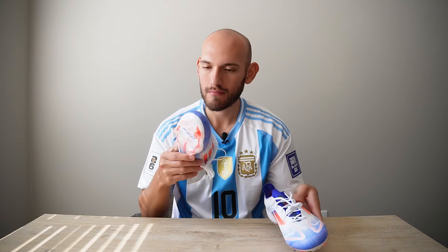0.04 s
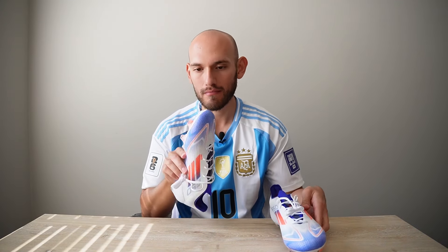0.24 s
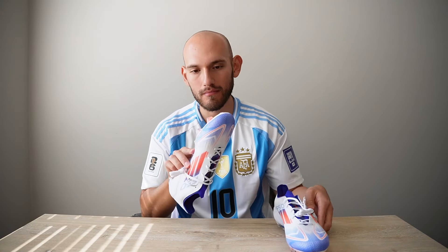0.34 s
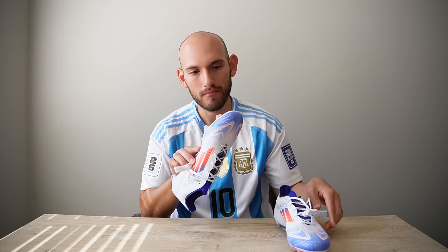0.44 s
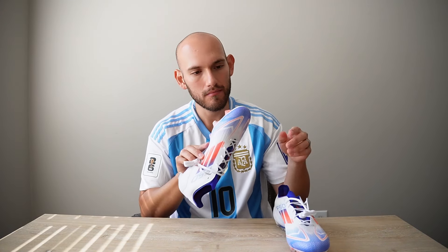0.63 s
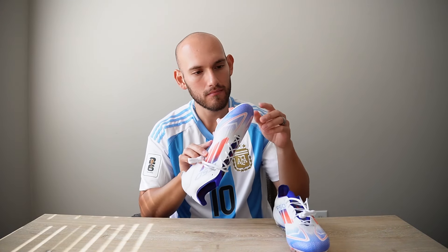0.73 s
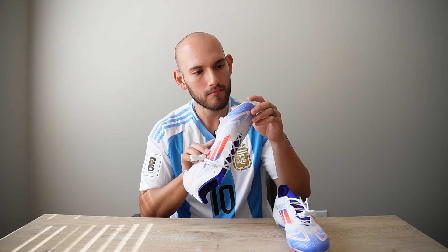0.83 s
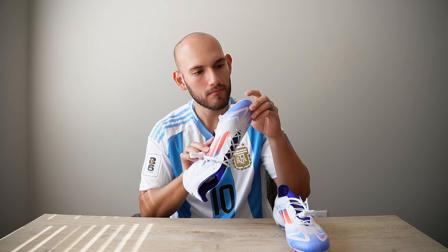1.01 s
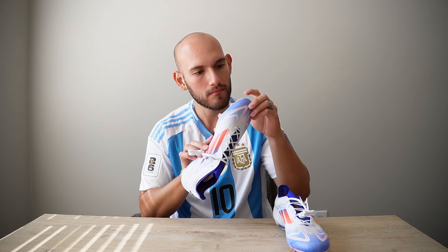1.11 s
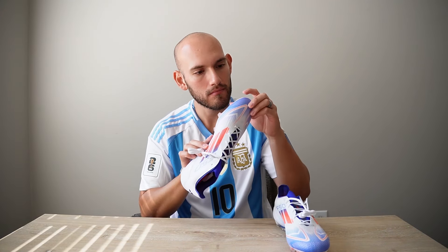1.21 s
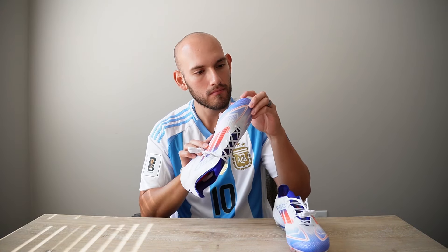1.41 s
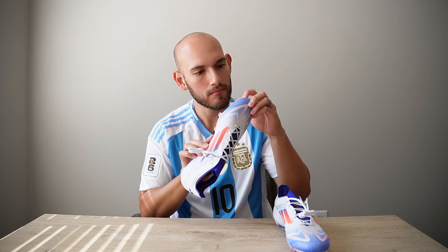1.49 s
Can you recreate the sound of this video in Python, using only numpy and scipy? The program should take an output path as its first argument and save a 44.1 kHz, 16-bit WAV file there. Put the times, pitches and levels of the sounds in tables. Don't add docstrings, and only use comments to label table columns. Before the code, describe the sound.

Hollow knocks of a hard-studded shoe landing and rocking on a wooden table, with brief scuffs and sleeve rustle, then quiet with soft fingertip taps; small bare room with short reverberation, microphone worn close by.

```python
import sys
import numpy as np
from scipy import signal
from scipy.fft import rfft, irfft
from scipy.io import wavfile
from scipy.ndimage import uniform_filter1d, minimum_filter1d

SR = 44100
rng = np.random.default_rng(int(sys.argv[2]) if len(sys.argv) > 2 else 0)


def invert_db(level):
    return 10 ** (np.asarray(level, dtype=float) / 20)


def store_wav(level_fs):
    pcm = np.round(np.clip(np.atleast_2d(level_fs), -1, 1) * 32767)
    wavfile.write(sys.argv[1], SR, pcm.T.astype(np.int16))


N = 68355


def unit(x):
    return x / np.sqrt(np.mean(x ** 2))


def coloured(points):
    hz, db = np.array(points).T
    f = np.maximum(np.fft.rfftfreq(N, 1 / SR), 1)
    gain = invert_db(np.interp(np.log(f), np.log(hz), db))
    return unit(irfft(rfft(rng.standard_normal(N)) * gain, N))


def walk(rate):
    k = int(SR / rate)
    steps = np.repeat(rng.standard_normal(N // k + 1), k)
    return unit(uniform_filter1d(uniform_filter1d(steps, k), k)[:N])


def decay(age, t60):
    return np.exp(-np.log(1000) * age / t60)


def ring(start, hz, db, t60, rise=1e-4, phase=0.):
    age = np.maximum(np.arange(N) / SR - start, 0)
    swell = (1 - np.exp(-age / rise)) ** 2
    return invert_db(db) * swell * decay(age, t60) * np.sin(2 * np.pi * hz * age + phase)


def modal_hits(hits, modes, trim_db=0):
    return sum((-1) ** k * ring(start, hz, db + trim_db + mode_db, t60)
               for start, db in hits for k, (hz, mode_db, t60) in enumerate(modes))


def bursts(rows, colour, rise):
    envelope = np.zeros(N)
    for start, db, t60 in rows:
        age = np.maximum(np.arange(N) / SR - start, 0)
        envelope += invert_db(db) * (1 - np.exp(-age / rise)) * decay(age, t60)
    return coloured(colour) * envelope


# f/Hz, level/dB
ROOM_TONE_COLOUR = [(12, -41), (20, -5.5), (71, -8), (108, -8), (244, -1.5), (314, -8.5), (506, -7),
                    (15200, -27.5), (16500, -35)]


def room_tone():
    return invert_db(-56 + .5 * walk(7.64)) * coloured(ROOM_TONE_COLOUR)


# t/s, dull rub level/dB, fine hiss level/dB
RUSTLE = [
    (0, -50.5, -72),
    (0.102, -44.5, -67.5),
    (.2, -48.5, -75),
    (.35, -42.5, -65.5),
    (.45, -43.5, -64.5),
    (.55, -46.5, -66.5),
    (.65, -48.5, -67),
    (.8, -55, -93),
]
# f/Hz, level/dB
RUB_COLOUR = [(59, -64), (100, -7), (269, -5.5), (410, 3.5), (521, 4), (1380, -8), (4450, -14.5),
              (8000, -34.5), (10400, -81), (17600, -120)]
STILL_S = (.8, .95)


def rustle():
    t = np.arange(N) / SR
    times, rub_db, hiss_db = np.array(RUSTLE).T
    flicker_db = 1.3
    hiss_noise = coloured([(4450, -14), (9650, 0), (14850, -10)])
    rub = invert_db(np.interp(t, times, rub_db) + flicker_db * walk(30)) * coloured(RUB_COLOUR)
    hiss = invert_db(np.interp(t, times, hiss_db) + flicker_db * walk(47)) * hiss_noise
    return np.interp(t, STILL_S, (1, 0)) * (rub + hiss)


# f/Hz, level/dB, T60/s
CRACK_MODES = [(1430, 5, 0.004), (1854, 1, 0.0074), (2257, -10, .010)]


def knock(start, db, crack_db, hz, contact):
    shell = -ring(start, hz, db, 0.02, contact)
    hollow = ring(start, 0.4245 * hz, db - 14, 0.057, 7.0 * contact)
    crack = sum((-1) ** k * ring(start, f, crack_db + mode_db, t60, .6 * contact)
                for k, (f, mode_db, t60) in enumerate(CRACK_MODES))
    return shell + hollow + crack


# t/s, knock level/dB, crack level/dB, f/Hz
TAPS = [(0.024, -33, -72, 500), (0.148, -58, -57, 850), (0.165, -26.5, -77, 415), (0.385, -34, -68, 880),
        (0.907, -27.5, -54, 520), (0.914, -33, -60, 890), (0.952, -35.5, -70, 520), (0.974, -43, -70, 445),
        (1.054, -34, -76, 520), (1.327, -46, -80, 250), (1.494, -34.5, -61, 544), (1.503, -58, -46, 516),
        (1.530, -29.5, -56, 430), (1.537, -33, -41, 884), (1.544, -27, -60, 457)]


def taps():
    return sum(knock(*row, contact=.0011) for row in TAPS)


# delay t/s, level/dB
ECHOES = [
    (.0062, -30),
    (.0150, -16),
    (.0225, -12.5),
    (.031, -46),
    (.037, -52),
]
# f/Hz, level/dB, T60/s
TAIL = [(250, -28, 0.41), (500, -31, 0.34), (1020, -33.5, 0.31), (2160, -35.5, 0.29), (4000, -42, 0.36),
        (8000, -43, 0.1)]


def room(x):
    t = np.arange(N) / SR
    response = np.zeros(N)
    for delay, db in ECHOES:
        response[int(delay * SR)] += invert_db(db)
    wall_absorption = signal.butter(2, 1610, fs=SR, output="sos")
    response = signal.sosfilt(wall_absorption, response)
    build_up = 1 - np.exp(-(t / 0.011) ** 2)
    for hz, db, t60 in TAIL:
        band = coloured([(hz / 3, -40), (hz / 1.4, 0), (hz * 1.4, 0), (hz * 3, -40)])
        response += invert_db(db) * np.sqrt(hz / SR) * band * decay(t, t60) * build_up
    return signal.fftconvolve(x, response)[:N]


# t/s, level/dB, T60/s
SNAPS = [
    (0.1195, -24, .007),
    (0.127, -42, .12),
    (0.1990, -38, .007),
    (0.2256, -34, .010),
    (0.326, -44, .008),
    (0.4726, -16, .006),
    (0.5942, -48, .005),
]
# f/Hz, level/dB
SNAP_COLOUR = [(1500, -25), (3000, 7), (5000, -1), (7000, -8.5), (10000, -14.5), (14500, -23), (17000, -42)]


def snaps():
    return bursts(SNAPS, SNAP_COLOUR, rise=.00015)


# t/s, level/dB
TICKS = [
    (0.12, -17.5),
    (0.1252, -20.5),
    (0.1255, -29.5),
    (0.13, -33),
]
# f/Hz, level/dB, T60/s
TICK_MODES = [(915, 7, .016), (1350, 4, .008), (1820, 2, .007), (2550, 6, .009), (3100, 1, .007),
              (3750, 7, .006), (4500, 4, .006), (5300, 4, .006), (6500, -4, .005), (12200, -9, .004),
              (14300, -7, .004)]


def ticks():
    return modal_hits(TICKS, TICK_MODES, trim_db=-10.5)


# t/s, knock level/dB, crack level/dB, table level/dB, f/Hz
THUMPS = [
    (0.1987, -0.5, -17.5, -9.5, 605),
    (0.2250, -3.5, -25, -9.5, 394),
    (0.2634, -9, -51, -13, 256),
    (0.4726, 1.5, -0.5, -5.5, 564.4),
    (0.5940, 0.5, -11.5, -14.5, 575),
]


def thumps():
    return sum(knock(start, db, crack_db, hz, contact=.00045) for start, db, crack_db, _, hz in THUMPS)


# t/s, table level/dB
REBOUNDS = [
    (0.299, -25.5),
    (0.324, -27),
    (0.506, -16),
    (0.631, -35),
    (.675, -48),
]
# f/Hz, level/dB, T60/s
TABLE_MODES = [(162.8, -21.5, 0.96), (189.34, -5, 0.41), (239.8, -3.5, 0.46), (263.83, -5, 0.47),
               (282.9, -2, 0.24), (320.6, -9.5, 0.18), (385.7, -1.5, 0.24), (464, -3, 0.38),
               (543.3, -5, .3), (622, -27, 0.38), (695.6, -24.5, 0.1), (778.4, -7, 0.14), (861, -14, 0.23),
               (983, -21, 0.35)]


def table():
    blows = [(row[0], row[3]) for row in THUMPS] + REBOUNDS
    bloom_cycles, scatter_db, detune = 2.25, 3.5, 0.0058
    out = np.zeros(N)
    for start, blow_db in blows:
        for hz, mode_db, t60 in TABLE_MODES:
            level, phase, pitch = rng.standard_normal(3)
            db = blow_db - 11 + mode_db + scatter_db * level
            out += ring(start, hz * (1 + detune * pitch), db, t60, bloom_cycles / hz, np.pi * phase)
    return out


# t/s, level/dB
EDGES = [
    (0.1990, -30),
    (0.225, -36.5),
    (0.4721, -12.5),
    (0.5954, -33.5),
]
# f/Hz, level/dB, T60/s
EDGE_MODES = [(2740, 1.5, 0.0087), (3400, 1, 0.0082), (4200, -3, .006), (4980, -8, 0.0044),
              (6050, -16, 0.0026), (8400, -17.5, .004), (11500, -19, .003)]


def edges():
    return modal_hits(EDGES, EDGE_MODES)


# t/s, level/dB, T60/s
SCUFFS = [
    (.200, -32, 0.12),
    (.228, -29.5, 0.28),
    (.476, -30, 0.4),
    (.596, -39.5, .25),
]
# f/Hz, level/dB
SCUFF_COLOUR = [(600, -3), (1100, 9), (2300, -0.5), (4000, -24), (8000, -60)]


def scuffs():
    return bursts(SCUFFS, SCUFF_COLOUR, rise=.004) * invert_db(2 * walk(200))


# t/s, lower mode level/dB, upper mode level/dB
BOOMS = [
    (.200, -35, -33),
    (0.242, -39.5, -27),
    (.285, -41.5, -41),
    (0.477, -37, -28.5),
    (.60, -39, -27),
    (0.652, -43, -42),
]
BOOM_HZ = (70, 124.5)
BOOM_T60_S = (.4, .62)


def boom():
    return sum(ring(start, hz, db, t60, rise=.8 / hz)
               for start, *levels in BOOMS for db, hz, t60 in zip(levels, BOOM_HZ, BOOM_T60_S))


def scene():
    hits = taps() + snaps() + ticks() + thumps() + edges()
    background = room_tone()
    struck = hits + room(hits) + table() + boom()
    struck_low_cut = signal.butter(3, 59, "high", fs=SR, output="sos")
    mix = signal.sosfilt(struck_low_cut, struck) + scuffs() + rustle() + background
    return mix[None]


def band_limit(x):
    return signal.sosfilt(signal.butter(12, 16650, fs=SR, output="sos"), x)


def record(dry):
    ceiling = .527
    gain = minimum_filter1d(ceiling / np.maximum(np.abs(dry), ceiling), size=89)
    mix = dry * uniform_filter1d(gain, size=45)
    return band_limit(mix)


dry = scene()
out = record(dry)
store_wav(out)
```